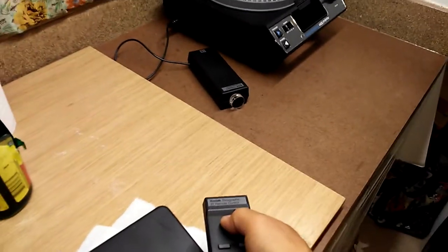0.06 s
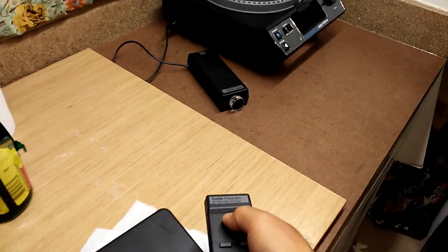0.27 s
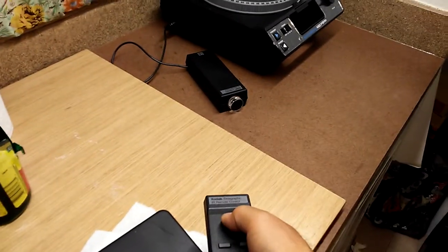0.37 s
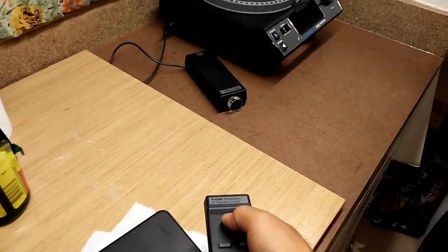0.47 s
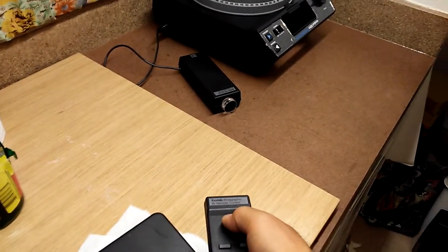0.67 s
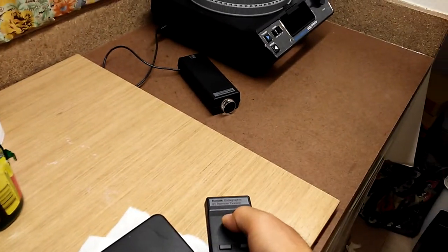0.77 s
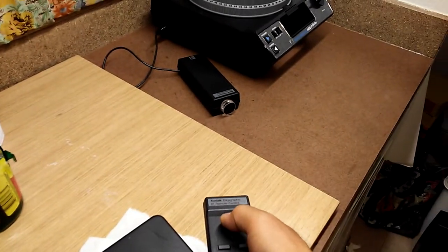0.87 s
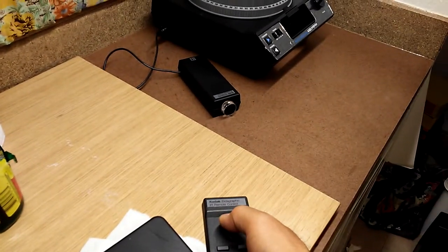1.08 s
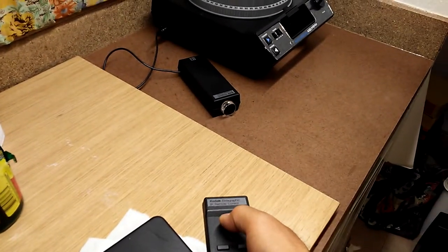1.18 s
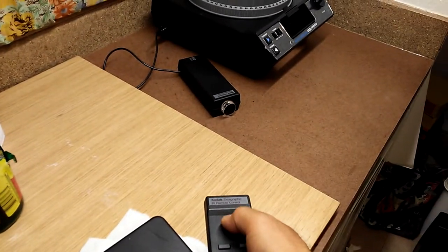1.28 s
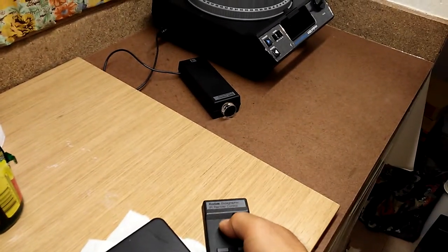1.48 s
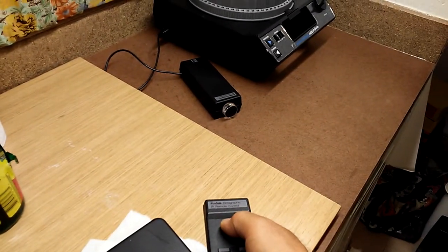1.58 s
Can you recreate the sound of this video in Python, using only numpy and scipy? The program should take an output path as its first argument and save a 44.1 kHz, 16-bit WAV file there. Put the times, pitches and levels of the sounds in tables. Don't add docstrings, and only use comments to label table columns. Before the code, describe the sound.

A slide projector changes a slide in a small room, heard close: a loud metallic slam, a knock and light ticks, a brief rattle, a bright clatter, then a double tray clunk over steady fan noise.

```python
import sys
import numpy as np
from scipy import signal
from scipy.fft import rfft, irfft, next_fast_len
from scipy.io import wavfile
from scipy.ndimage import uniform_filter1d, map_coordinates

SR = 44100
rng = np.random.default_rng(int(sys.argv[2]) if len(sys.argv) > 2 else 0)


def output_pcm(signal):
    pcm = np.clip(np.atleast_2d(signal).T, -1, 1) * 32767
    wavfile.write(sys.argv[1], SR, np.round(pcm).astype(np.int16))


def gain_from_db(level_db):
    decades = np.asarray(level_db, float) / 20
    return 10 ** decades


N = 72765


def unit(x):
    return x / np.sqrt(np.mean(x ** 2) + 1e-20)


def along(points, hz):
    f, v = np.transpose(points)
    return np.interp(np.log(hz + 1), np.log(f + 1), v)


def wobble(rate):
    knots = rng.standard_normal(int(N * rate / SR) + 4)
    return map_coordinates(knots, [np.arange(N) * rate / SR])


def filtered(x, response):
    m = next_fast_len(len(x) + 8192)
    return irfft(rfft(x, m) * response(np.fft.rfftfreq(m, 1 / SR)), m)[:len(x)]


def ringing(peaks, f):
    total = 0
    for k, (centre, width, db) in enumerate(peaks):
        damping = 1j * f * width
        total = total + (-1) ** k * gain_from_db(db) * damping / (centre * centre - f * f + damping)
    return total


def causal(gain):
    cepstrum = irfft(np.log(np.maximum(gain, 1e-6)))
    half = len(cepstrum) // 2
    cepstrum[1:half] *= 2
    cepstrum[half + 1:] = 0
    return np.exp(rfft(cepstrum))


def reverb(x):
    # (frequency [Hz], t60 [s])
    room_decay = [(200, 0.23), (2000, 0.18), (8000, 0.15), (15000, 0.14)]
    first_wall_s, room_db = .004, -5
    hz, t, z = signal.stft(rng.standard_normal(len(x)), SR, nperseg=128)
    decay = gain_from_db(-60 * t / along(room_decay, hz)[:, None])
    tail = signal.istft(z * decay, SR, nperseg=128)[1]
    tail = np.pad(tail / np.linalg.norm(tail), (round(first_wall_s * SR), 0))
    return x + gain_from_db(room_db) * signal.fftconvolve(x, tail)[:len(x)]


def add(out, x, s):
    i = round(s * SR)
    out[i:i + len(x)] += x[:len(out) - i]


def chatter(contacts, tone, ring, ring_db, rise_s, gain_db):
    out, m = np.zeros(N), 16384
    t, hz = np.arange(m) / SR, np.fft.rfftfreq(m, 1 / SR)
    for s, db, length, tilt_db in contacts:
        shape = (1 - np.exp(-t / rise_s)) * np.exp(-t / max(length, .0005))
        spread_db = 2.5 * np.minimum(rng.exponential(size=m), 4)
        clump_db = 1.2 * rng.standard_normal(m // 32).repeat(32)
        impacts = unit(rng.standard_normal(m) * gain_from_db(spread_db + clump_db)) * shape / shape.max()
        struck = [(c, w, level + 1.5 * rng.standard_normal()) for c, w, level in ring]
        colour = gain_from_db(along(tone, hz) + tilt_db * np.log2((hz + 100) / 4000))
        colour = colour * (1 + gain_from_db(ring_db) * np.abs(ringing(struck, hz)))
        heard = irfft(rfft(impacts) * causal(unit(colour)), m)
        add(out, gain_from_db(db + gain_db) * reverb(heard), s)
    return out


def fan():
    # (frequency [Hz], level [dB per Hz])
    rush_tone = [(30, -45), (82, 5.5), (100, -39), (155, -9.5), (320, 2.5), (650, -8.5), (1270, -7),
                 (1500, -36.5)]
    # (frequency [Hz], level [dB per Hz])
    hiss_tone = [(820, -39), (1400, -11.5), (1660, -7.5), (2100, -3), (2900, -14.5), (5540, -15),
                 (6580, -19.5), (8220, -14), (15700, -32)]
    # (frequency [Hz], width [Hz], level [dB])
    cavities = [(283.4, 6.8, 1.5), (336, 22, -20), (496.5, 27, 5.5), (802, 17.4, 9), (1132, 66, 2.5),
                (1658, 42, 8)]
    t = np.arange(N) / SR - .83

    def air(colour):
        return unit(filtered(rng.standard_normal(N),
                             lambda f: gain_from_db(along(colour, f)) * (1 + np.abs(ringing(cavities, f)))))

    def tone(hz, db, unsteady_db):
        return np.sqrt(2) * gain_from_db(db + unsteady_db * wobble(9.95)) * np.cos(2 * np.pi * hz * t)

    mains_hz = 60
    hum = tone(59.0, -43.5, .6)
    hum += tone(55.3, -52.5, 1.5)
    hum += tone(41, -61.5, 1.5)
    hum += tone(2 * mains_hz, -65.5, 2.5) + tone(4 * mains_hz, -55, 2.2)
    rush = air(rush_tone) * gain_from_db(-46 + 1.2 * wobble(7) + 1.5 * wobble(50))
    hiss = air(hiss_tone) * gain_from_db(-54 + .8 * wobble(6))
    return hum + rush + hiss


def drive():
    # (start [s], end [s], level [dB])
    strokes = [
        (-.04, 0.213, -53.5),
        (0.235, 0.668, -46),
        (0.765, 1.225, -44.5),
    ]
    # (frequency [Hz], level [dB per Hz])
    rub_tone = [(180, -13), (300, 0), (1180, -4), (1490, -12.5), (1910, -9.5), (3340, -18), (5480, -18),
                (6790, -20), (15500, -34.5)]
    ramp_s = .04
    t = np.arange(N) / SR
    running = np.zeros(N)
    for on, off, db in strokes:
        running += gain_from_db(db) * np.clip(np.minimum(t - on, off - t) / ramp_s, 0, 1)
    grit = rng.standard_normal(N) * gain_from_db(1.5 * wobble(70) + 1.5 * wobble(12))
    return unit(filtered(grit, lambda f: gain_from_db(along(rub_tone, f)))) * running


def pings():
    # (time [s], frequency [Hz], peak level [dB], t60
    # [s])
    part_pings = [(0.051, 1678, -49, 0.37), (0.188, 8740, -43, .03), (0.198, 8300, -32, .04),
                  (0.203, 6440, -24, 0.02), (.207, 1770, -36, .03), (0.2136, 8640, -15, 0.0094),
                  (0.2157, 7200, -28, .015), (.215, 534.5, -27.5, 0.16), (0.217, 980, -27, 0.032),
                  (0.22, 8100, -24, 0.018), (0.2212, 5690, -24.5, 0.017), (.222, 2500, -40, 0.054),
                  (.229, 7350, -28, 0.012), (0.257, 3100, -29.5, 0.045), (0.26, 8500, -39, .03),
                  (.27, 2010, -31.5, 0.022),
                  (.387, 2000, -24, 0.0083), (.3875, 5060, -35, 0.017), (.388, 3027, -33.5, 0.044),
                 (0.3945, 2410, -31, 0.015), (0.401, 2250, -34, 0.031), (.4415, 4900, -34, 0.026),
                 (.453, 4920, -42, 0.039), (.516, 2220, -52, .04), (0.546, 2370, -45.5, 0.057),
                 (0.558, 8380, -45, 0.045), (.566, 4280, -49, .05), (0.612, 2870, -50, 0.075),
                 (0.822, 3030, -33.5, 0.048),
                  (0.9081, 8250, -21, 0.0082), (.9095, 9110, -22, 0.025), (0.912, 4200, -28, 0.016),
                   (.915, 4130, -24, 0.018), (.918, 9050, -30, 0.017), (.921, 3640, -27, 0.012),
                   (0.926, 8880, -39, 0.025), (0.93, 9100, -38, 0.028), (0.9282, 3900, -31, 0.035),
                   (.942, 8950, -46, 0.021), (0.953, 4260, -44, 0.02),
                  (.985, 4570, -32.5, 0.028), (1.023, 6300, -35, 0.044), (1.0266, 345, -36, 0.082),
                  (1.0405, 2760, -34, 0.0091), (1.0385, 8000, -34, 0.021), (1.043, 4570, -31, .02),
                  (1.044, 2730, -40, 0.017), (1.098, 5280, -41, 0.036), (1.105, 3100, -44.5, .035),
                  (1.112, 6420, -34, 0.044), (1.114, 5710, -41, 0.034), (1.121, 8900, -35, 0.029),
                  (1.124, 5740, -37, 0.033), (1.1306, 8200, -28, 0.0089), (1.132, 6030, -35, .04),
                  (1.135, 8630, -36, 0.018), (1.135, 3620, -41.5, 0.029)]
    # (frequency [Hz], t60 [s])
    longest = [(1700, .3), (2000, .05), (5000, .032), (15000, .03)]
    rise_s, flutter_db = .0009, 4
    pitch_waver = .018
    out, t = np.zeros(N), np.arange(8192) / SR
    for s, hz, db, t60 in part_pings:
        waver, flutter = (unit(uniform_filter1d(v, size=60)) for v in rng.standard_normal((2, len(t))))
        shape = (1 - np.exp(-t / rise_s)) * gain_from_db(-60 * t / min(t60, along(longest, hz)))
        phase = 2 * np.pi * hz * np.cumsum(1 + pitch_waver * waver) / SR
        ping = shape / shape.max() * gain_from_db(flutter_db * flutter) * np.sin(phase)
        add(out, gain_from_db(db) * (ping + reverb(ping)) / 2, s)
    return out


def belt():
    scuff_db = [-50, -57, -49, -55, -52, -50.5, -51, -52.5]
    # (frequency [Hz], level [dB per Hz])
    scuff_tone = [(2500, -28), (4500, 0.5), (5600, -11), (6600, -4), (7500, -10.5), (9200, -1),
                  (11000, -13), (15500, -29)]
    # (frequency [Hz], width [Hz], level [dB])
    scuff_ring = [(4350, 320, -3), (6640, 230, -4), (8750, 450, -18)]
    start_s, turn_s = .124, .2167
    passes = [(start_s + k * turn_s, db, .014, 0) for k, db in enumerate(scuff_db)]
    return chatter(passes, scuff_tone, scuff_ring, ring_db=2.5, rise_s=.003, gain_db=0)


def gate():
    # (time [s], peak level [dB], chatter length [s], brightness [dB per octave])
    slams = [
        (.188, -28, 0.022, -1.5),
        (.194, -18.5, 0.018, 3),
        (.203, -16, 0.011, -0.5),
        (.214, -6.5, 0.0025, 1),
        (.220, -11, 0.0048, 2),
        (.229, -22.5, 0.016, 0),
        (.242, -29, 0.005, -7.5),
        (.256, -22, 0.0038, 1),
    ]
    # (frequency [Hz], level [dB per Hz])
    gate_tone = [(120, -53), (200, -10), (321, -7), (1260, 2.5), (1510, -6), (1880, 0), (3550, -2),
                 (8660, -7), (15500, -18.5)]
    # (frequency [Hz], width [Hz], level [dB])
    gate_ring = [(523, 8.8, -13), (980, 39, -31), (2500, 35, -23), (4540, 78, -8), (8700, 890, -4.5),
                 (12250, 160, -4)]
    return chatter(slams, gate_tone, gate_ring, ring_db=0.85, rise_s=0.0056, gain_db=-7.0)


def thumps():
    # (time [s], peak level [dB])
    pushes = [
        (0.204, -23.5),
        (.217, -32),
        (.246, -30.5),
        (.397, -31.5),
        (0.82, -58),
        (1.0275, -27),
        (1.039, -29.5),
    ]
    # (frequency [Hz], width [Hz], level [dB])
    table_top = [(320.6, 39, 13), (490, 118, 4), (234, 4.3, -5.5)]
    out, push = np.zeros(N), np.zeros(8192)
    push[:40] = np.hanning(40)
    knock = filtered(push, lambda f: ringing(table_top, f) * (1j * f / (60 + 1j * f)) ** 2)
    for s, db in pushes:
        add(out, gain_from_db(db + 2) * reverb(knock / np.abs(knock).max()), s - .002)
    return out


def levers():
    # (time [s], peak level [dB], chatter length [s], brightness [dB per octave])
    ticks = [(.334, -33, 0.033, -6.5), (.4385, -25.5, 0.0074, -5), (.515, -31, 0.0061, -4.5),
             (.529, -32, 0.012, 2), (.559, -34.5, 0.015, 1), (.607, -34.5, 0.0082, -2),
             (.752, -33, 0.019, -1), (.763, -22, 0.01, -1.2), (.983, -18.5, 0.01, -3),
             (1.098, -29.5, 0.0065, 0.39), (1.112, -30.5, 0.01, -5), (1.122, -27, 0.012, 0.27),
             (1.131, -22.5, 0.0024, 0.15)]
    # (frequency [Hz], level [dB per Hz])
    lever_tone = [(880, -23.5), (1500, -7), (2170, -4), (2620, -9), (3150, -8.5), (6370, -2.5),
                  (7020, -5.5), (8540, -2.5), (15500, -8)]
    # (frequency [Hz], width [Hz], level [dB])
    lever_ring = [(4560, 320, -2), (5530, 400, -7), (8310, 1200, -1), (10520, 430, -0.5)]
    return chatter(ticks, lever_tone, lever_ring, ring_db=3.1, rise_s=0.0021, gain_db=-11.5)


def cam():
    # (time [s], peak level [dB], chatter length [s], brightness [dB per octave])
    knocks = [
        (.3865, -23.5, 0.013, 0.17),
        (.396, -39, 0.0047, 0.83),
    ]
    # (frequency [Hz], level [dB per Hz])
    cam_tone = [(900, -20), (1500, -10.5), (1900, -3.5), (3100, -10.5), (3600, -10.5), (5000, -12.5),
                (15500, -28)]
    # (frequency [Hz], width [Hz], level [dB])
    cam_ring = [(2400, 150, -1), (3040, 140, -2), (4660, 250, -4)]
    return chatter(knocks, cam_tone, cam_ring, ring_db=3, rise_s=0.0013, gain_db=-8)


def rattle():
    # (time [s], peak level [dB], chatter length [s], brightness [dB per octave])
    shakes = [
        (.517, -34, 0.018, -1),
        (.54, -55, 0.01, -0.49),
        (.615, -42, 0.03, 0.38),
        (.66, -35, 0.011, -0.35),
        (.764, -28.5, 0.013, 0.56),
        (.7895, -22, 0.0039, -0.54),
        (.812, -24.5, 0.017, 0.028),
        (.8185, -25, 0.012, -0.2),
        (.836, -32, 0.0079, -0.4),
    ]
    # (frequency [Hz], level [dB per Hz])
    rattle_tone = [(300, -7), (600, 1), (1300, -8), (2200, 5), (3000, -11), (5000, -9), (15500, -43)]
    # (frequency [Hz], width [Hz], level [dB])
    rattle_ring = [(1050, 54, 3), (2000, 78, -27), (2954, 57, 10), (4500, 83, 0)]
    return chatter(shakes, rattle_tone, rattle_ring, ring_db=4.2, rise_s=0.0023, gain_db=-10.5)


def slide():
    # (time [s], peak level [dB], chatter length [s], brightness [dB per octave])
    drops = [
        (.904, -32, 0.0034, 5),
        (.9075, -14.5, 0.007, 4.5),
        (.918, -20, 0.0051, -3.6),
        (.928, -21.5, 0.0052, -3),
    ]
    # (frequency [Hz], level [dB per Hz])
    slide_tone = [(350, -31), (600, -17), (866, -6.5), (2010, -5.5), (2220, -5), (4260, -1), (6400, -3),
                  (8870, -1), (15500, -22)]
    # (frequency [Hz], width [Hz], level [dB])
    slide_ring = [(1940, 150, -6), (3680, 200, -16), (4270, 130, -27), (9200, 250, -12.5)]
    return chatter(drops, slide_tone, slide_ring, ring_db=1.5, rise_s=0.0021, gain_db=-6.5)


def tray():
    # (time [s], peak level [dB], chatter length [s], brightness [dB per octave])
    steps = [
        (1.0245, -20.5, 0.013, 0.9),
        (1.037, -16.5, 0.012, 0.7),
        (1.059, -48, 0.0039, -0.65),
        (1.076, -42, 0.003, -0.66),
    ]
    # (frequency [Hz], level [dB per Hz])
    tray_tone = [(290, -70), (500, -18), (1090, -2.5), (1800, -11), (2460, -3.5), (8240, -8.5),
                 (15500, -26)]
    # (frequency [Hz], width [Hz], level [dB])
    tray_ring = [(1090, 280, 1), (2630, 180, -3.5), (4200, 160, -6), (7760, 250, -12)]
    return chatter(steps, tray_tone, tray_ring, ring_db=2.5, rise_s=0.00076, gain_db=-10.5)


def scene():
    running = fan() + drive() + belt()
    change = gate() + levers() + cam() + rattle() + slide() + tray()
    return (running + change + pings() + thumps())[None]


def top_cut(x):
    return signal.sosfilt(signal.butter(12, 16800, fs=SR, output="sos"), x)


def record(dry):
    top_hz, leak_db = 15750, -42
    kept = filtered(dry[0], lambda f: np.where(f < top_hz, 1, gain_from_db(leak_db)))
    return top_cut(kept[None])


dry = scene()
out = record(dry)
output_pcm(out)
```